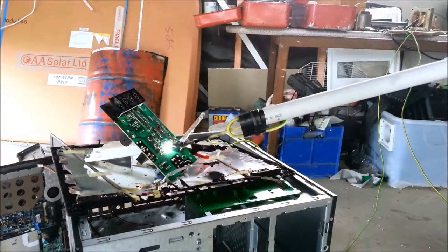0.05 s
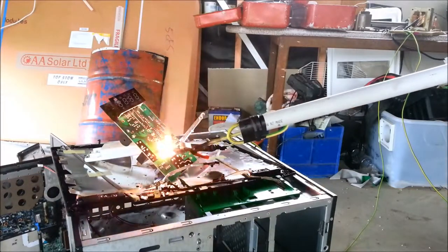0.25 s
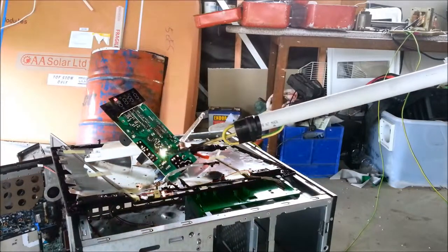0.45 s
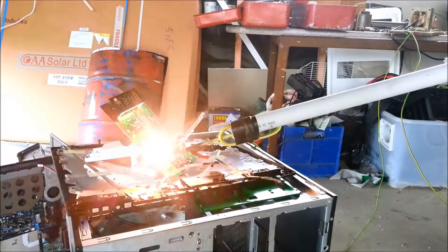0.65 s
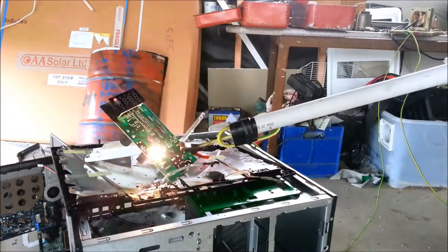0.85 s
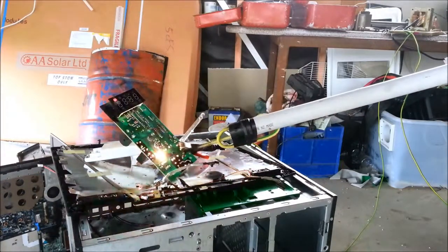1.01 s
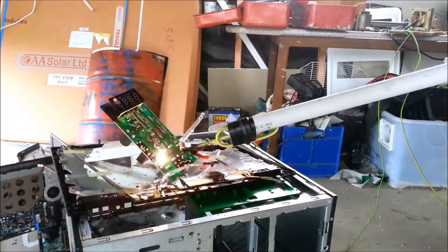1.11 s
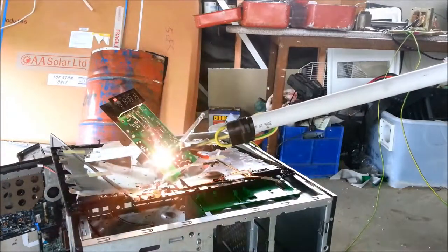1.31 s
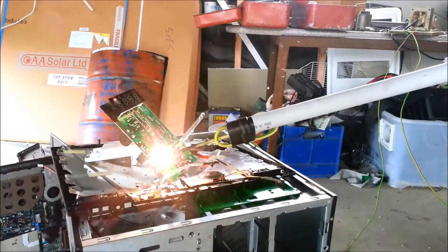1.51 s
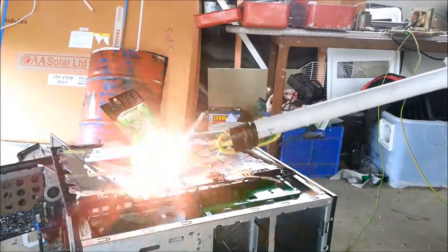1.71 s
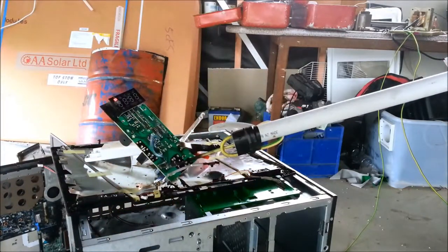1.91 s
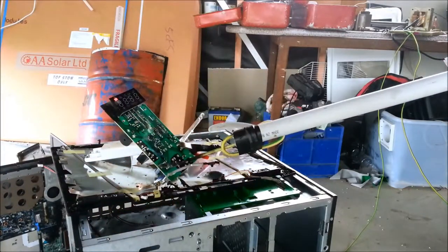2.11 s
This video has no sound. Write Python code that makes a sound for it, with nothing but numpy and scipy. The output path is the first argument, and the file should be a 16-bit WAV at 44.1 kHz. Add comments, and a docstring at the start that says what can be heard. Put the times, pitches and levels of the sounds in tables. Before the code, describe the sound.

Harsh electrical buzzing and sizzling with sharp pops and spark snaps over a low workshop drone.

```python
"""A mains-fed high-voltage arc burns over a circuit board in a small, droning workshop.
From the start it restrikes every half cycle with a push of hot air and a tick: a harsh buzz that hums
in the room and rings the metal case, while the charring board sizzles. Soon the arc flares and pops,
the board cracks and single sparks snap. The arc goes out near the end; a faint squeak follows,
and the room's low drone remains."""
import sys
import numpy as np
from scipy import signal
from scipy.fft import rfft, irfft, next_fast_len
from scipy.io import wavfile
from scipy.ndimage import map_coordinates

SR = 44100
rng = np.random.default_rng(int(sys.argv[2]) if len(sys.argv) > 2 else 0)


def dump(signal):
    """Clip the signal to [-1, 1] and save it as 16-bit WAV at the path in sys.argv[1]."""
    limited = np.clip(np.atleast_2d(signal).T, -1, 1)
    pcm = np.round(limited * 32767).astype(np.int16)
    wavfile.write(sys.argv[1], SR, pcm)


N = 94815


def amp(db):
    """Decibels to amplitude ratio."""
    return 10 ** (np.asarray(db) / 20)


def unit(x):
    """Normalisation to rms 1."""
    return x / np.sqrt(np.mean(x ** 2) + 1e-20)


def along(points, hz):
    """Interpolation of (frequency_hz, value) points on a logarithmic axis."""
    f, v = np.transpose(points)
    return np.interp(np.log(hz + 1), np.log(f + 1), v)


def at(points, s):
    """Linear interpolation of (time_s, value) points."""
    return np.interp(s, *np.transpose(points))


def wobble(rate_hz):
    """Smooth random modulation: a spline through rate_hz random knots a second."""
    knots = rng.standard_normal(int(N * rate_hz / SR) + 4)
    return map_coordinates(knots, [np.arange(N) * rate_hz / SR])


def filtered(x, response):
    """Linear filtering: the spectrum is multiplied by a frequency response."""
    size = 2 * next_fast_len(N)
    return irfft(rfft(x, size) * response(np.fft.rfftfreq(size, 1 / SR)), size)[..., :x.shape[-1]]


def coloured(x, points):
    """Minimum-phase filtering through (frequency_hz, gain_db) points."""
    def response(hz):
        cepstrum = irfft(np.log(amp(along(points, hz))))
        cepstrum[1:len(cepstrum) // 2] *= 2
        cepstrum[len(cepstrum) // 2 + 1:] = 0
        return np.exp(rfft(cepstrum))
    return filtered(x, response)


def add(track, start_s, sound):
    """Superposition of a sound on a track."""
    i = int(np.clip(round(start_s * SR), 0, N))
    track[i:i + len(sound)] += sound[:N - i]


def push(width_ms, rebound=0.17, slower=4):
    """A pressure pulse: brief compression, then a slow, weak rarefaction."""
    u = np.arange(SR // 100) / SR * 1000 / width_ms
    return u * np.exp(1 - u) - rebound * (u / slower) ** 2 * np.exp(1 - u / slower) / 2


def burst(t60_s):
    """A noise transient with exponential decay and a peak near 1."""
    t = np.arange(SR // 40) / SR
    envelope = amp(-60 * t / t60_s) * (1 - np.exp(-20 * t / t60_s)) * 2
    noise = rng.standard_normal(len(t)) * envelope
    return 0.39 * noise * np.linalg.norm(envelope) / np.linalg.norm(noise)


# Strength of the pushes of hot air: time_s, level_db
PUSH_LEVEL = [(0, -36), (.06, -18), (.11, -17), (.2, -39), (.28, -16), (.38, -24.5), (.448, -28),
              (.47, -67), (.502, -21), (.72, -22), (.878, -22), (.892, -54), (1.05, -33.5), (1.25, -25.5),
              (1.6, -19), (1.72, -19), (1.76, -44)]
# Spectral envelope of a push: frequency_hz, gain_db
PUSH_COLOUR = [(100, -3.5), (300, -2.5), (1400, 0), (2500, -3), (4600, 5.5), (6200, -1)]
# Strength of the restrike ticks: time_s, level_db
TICK_LEVEL = [(0, -25.5), (.06, -19.5), (.1, -29.5), (.25, -33.5), (.27, -17.5), (.44, -17), (.465, -34),
              (.52, -23.5), (.69, -21), (.75, -37), (.87, -22.5), (1.55, -37), (1.68, -27), (1.81, -25)]
# Spectral envelope of a tick: frequency_hz, gain_db
TICK_COLOUR = [(300, -30), (1500, 0.5), (4300, -2), (6500, -6), (10000, 3), (14500, 0)]
STRIKES_HZ, FIRST_STRIKE_S, ARC_OUT_S = 100, .0002, 1.825


def arc(jitter_s=.00009, push_scatter_db=2.5, tick_scatter_db=6.5, tick_lag_s=.0002):
    """Thermal expansion: each half cycle the arc restrikes with a push of hot air and a tick."""
    pushes, ticks = np.zeros(N), np.zeros(N)
    for s in np.arange(FIRST_STRIKE_S, ARC_OUT_S, 1 / STRIKES_HZ):
        polarity_db = -1.5 * np.cos(np.pi * STRIKES_HZ * s)  # one direction of current strikes harder
        late, strong, sharp, wide = rng.standard_normal(4)
        start_s = s + jitter_s * late
        push_db = at(PUSH_LEVEL, start_s) + polarity_db + push_scatter_db * strong
        tick_db = at(TICK_LEVEL, start_s) + tick_scatter_db * sharp
        add(pushes, start_s, amp(push_db) * push(width_ms=0.077 * np.exp(0.17 * wide)))
        add(ticks, start_s + tick_lag_s, amp(tick_db) * burst(t60_s=0.0018))
    return coloured(pushes, PUSH_COLOUR) + coloured(ticks, TICK_COLOUR)


# Strength of the board's sizzle: time_s, level_db
SIZZLE_LEVEL = [(0, -39.5), (.12, -51.5), (.25, -45.5), (.29, -46.5), (.47, -43), (.69, -40), (.77, -47),
                (.89, -47), (.92, -41), (1.15, -42), (1.43, -46.5), (1.65, -46), (1.79, -37), (1.82, -46)]
# Spectral envelope of a spit: frequency_hz, gain_db
SIZZLE_COLOUR = [(200, -4.5), (1000, 2), (2500, -3), (3600, -2), (4900, 4), (6200, -5.5), (10000, -6.5),
                 (14500, -6.5)]


def sizzle(spits_per_s=5000, spread_db=5, pulsing_db=5.5, flutter_db=1.0):
    """Shot noise: thousands of tiny spits from the hot board, pulsing with the current."""
    t = np.arange(N) / SR
    spits = (rng.random(N) < spits_per_s / SR) * np.sign(rng.standard_normal(N))
    spits *= amp(spread_db * np.clip(rng.standard_normal(N), -2, 2))
    swing_db = pulsing_db * np.cos(2 * np.pi * STRIKES_HZ * t) + flutter_db * wobble(70)
    return unit(coloured(spits, SIZZLE_COLOUR)) * amp(at(SIZZLE_LEVEL, t) + swing_db) * (t < ARC_OUT_S)


# Multiples of the strike rate that stand in the room: harmonic_number, level_db
HUM_HARMONICS = [(3, 3.5), (4, -6), (6, -3.5), (7, -6.5), (8, -17), (11, -8.5), (12, -12.5), (13, -7.5)]
# Strength of the standing hum: time_s, level_db
HUM_LEVEL = [(0, -56), (.07, -49.5), (.13, -39.5), (.27, -37.5), (.36, -49), (.47, -65), (.55, -53),
             (.85, -48.5), (1.05, -57), (1.27, -47.5), (1.52, -47), (1.68, -38.5), (1.75, -37),
             (1.82, -58.5)]


def hum(waver_db=1.94, rasp_rad=0.16):
    """Standing waves: low harmonics of the buzz waver in the room, roughened by uneven strikes."""
    track, t = np.zeros(N), np.arange(N) / SR
    for harmonic, level_db in HUM_HARMONICS:
        gain = amp(level_db + waver_db * wobble(14.7))
        phase = 2 * np.pi * (harmonic * STRIKES_HZ * t + rng.random())
        track += gain * np.sin(phase + rasp_rad * wobble(STRIKES_HZ))
    return amp(at(HUM_LEVEL, t)) * track


def unsteady(x, top_hz=1350, notch_hz=7):
    """Comb filtering removes the steady low harmonics, whose echo is the standing hum."""
    def response(hz):
        offset_hz = (hz + STRIKES_HZ / 2) % STRIKES_HZ - STRIKES_HZ / 2
        return 1 - (hz < top_hz) * np.exp(-(offset_hz / notch_hz) ** 2)
    return filtered(x, response)


# Modes of the sheet-metal case under the board: pitch_hz, level_db, t60_s
CASE_MODES = [(451, -2.5, 0.38), (572.5, -3, 0.49), (688, -3.5, 0.27), (990, -2.5, 0.52)]


def case(pressure, gain_db=-55):
    """Forced vibration: pressure pulses excite the damped modes of the metal case."""
    t = np.arange(SR // 2) / SR
    ring = sum(amp(level_db - 60 * t / t60_s) * np.sin(2 * np.pi * (pitch_hz * t + rng.random()))
               for pitch_hz, level_db, t60_s in CASE_MODES)
    return amp(gain_db) * signal.fftconvolve(pressure, ring)[:N]


# Left-right likeness of diffuse sound: frequency_hz, coherence
COHERENCE = [(30, 0.01), (120, 0.71), (350, 0.59), (700, 0), (1400, 0), (5000, 0.02)]


def diffuse(size):
    """A diffuse field: stereo noise, partly coherent in the bass and incoherent in the treble."""
    def mid_and_side(hz):
        angle = np.arccos(np.clip(along(COHERENCE, hz), -1, 1)) / 2
        return np.array([np.cos(angle), np.sin(angle)])
    mid, side = filtered(rng.standard_normal((2, size)), mid_and_side)
    return np.array([mid + side, mid - side])


# Spectral envelope of the room's drone: frequency_hz, gain_db
DRONE_COLOUR = [(25, -42), (60, 3.5), (130, 6.5), (250, 5), (700, -1.5), (1200, -12.5), (2600, -15.5),
                (3900, -18), (4500, -21.5), (6000, -24.5), (14500, -24.5)]


def drone(level_db=-43):
    """Ambient noise: a steady, low diffuse field, slightly stronger on the right."""
    balance = amp([[-1], [1]])
    return amp(level_db) * unit(coloured(diffuse(N), DRONE_COLOUR)) * balance


# Reverberation time of the workshop: frequency_hz, t60_s
ROOM_T60 = [(200, 0.52), (1000, 0.3), (4000, 0.34), (14000, 0.4)]
# Spectral envelope of the reverberation: frequency_hz, gain_db
ROOM_COLOUR = [(60, -2), (170, 5.5), (300, -5), (450, -1.5), (680, -5.5), (1100, -2), (1650, 2),
               (2500, -0.5), (3700, -2), (7000, -1), (14000, -3)]


def room(x, gain_db=-3.5, gap_s=0.0012, tails=8):
    """Reverberation: each frequency decays at its own rate; random tails crossfade into one echo."""
    wet = np.zeros((2, N))
    for k in range(tails):
        hz, t, spectra = signal.stft(diffuse(SR // 2), SR, nperseg=256)
        decay = amp(-60 * t / along(ROOM_T60, hz)[:, None])
        tail = signal.istft(spectra * decay, SR, nperseg=256)[1]
        tail *= np.clip(np.arange(tail.shape[1]) / SR / gap_s - 1, 0, 1)  # wait for the first echo
        tail /= np.linalg.norm(tail[0])
        crossfade = np.sqrt(np.clip(1 - abs(np.linspace(0, tails - 1, N) - k), 0, 1))
        wet += signal.fftconvolve((x * crossfade)[None], tail, axes=1)[:, :N]
    return amp(gain_db) * coloured(wet, ROOM_COLOUR)


# Collapses of the flaring arc: start_s, level_db, rebound_hz, rebound_db
POPS = [(0.1223, -14, 3800, -44), (0.1324, -14, 1510, -21.5), (0.1413, -20, 3220, -46),
        (0.1531, -17, 1280, -20), (.1724, -27, 690, -28), (.181, -14.5, 814, -23),
        (.2012, -14.5, 1670, -16.5), (.2098, -28, 590, -23.5), (0.2516, -22, 360, -17),
        (0.2615, -6, 425, -22), (.2809, -21, 790, -30), (0.9109, -16, 1000, -27),
        (1.683, -7.5, 1330, -19.5), (1.6903, -15, 526, -18.5), (1.7017, -17, 670, -17),
        (1.7104, -21, 554, -23.5), (1.7193, -28, 1230, -21.5), (1.7301, -17, 344, -22)]


def pops(rise_cycles=0.52, puff_hz=340, puff_db=-7, puff_t60_s=0.045):
    """Damped oscillation: a flare collapses in a rarefaction; its hot gas rebounds with a rough puff."""
    pulses, puffs, t = np.zeros(N), np.zeros(N), np.arange(SR // 2) / SR
    for start_s, level_db, rebound_hz, rebound_db in POPS:
        u = t * rebound_hz / rise_cycles
        rebound = u * np.exp(1 - u) * np.sin(2 * np.pi * rebound_hz * t)
        add(pulses, start_s, -amp(level_db) * push(width_ms=0.089))
        add(pulses, start_s, -amp(rebound_db) * rebound)
        add(puffs, start_s, amp(rebound_db - 60 * t / puff_t60_s))
    air = unit(filtered(rng.standard_normal(N), lambda hz: 1 / (1 + (2 * hz / puff_hz - 2) ** 2) ** 2))
    return coloured(pulses + amp(puff_db) * puffs * air / 2, PUSH_COLOUR)


# Bits bursting off the board: start_s, level_db, t60_s, pitch_hz
CRACKS = [(0.2819, -8, 0.0065, 5900), (0.5805, -0.5, 0.0062, 13500), (0.5874, -9, .013, 4450),
          (.592, 3.5, 0.0071, 8800), (0.647, -25, 0.003, 7000), (1.767, -23, 0.0059, 9000),
          (1.7802, -15.5, 0.0069, 7440), (1.7887, -16, 0.0048, 4760), (1.868, -25, 0.011, 5500)]
# Spectral envelope of a crack: frequency_hz, gain_db
CRACK_COLOUR = [(150, -4), (1000, -5), (2200, -12), (3300, -5), (4400, 2), (5200, -5.5), (7200, -9),
                (8500, -6.5), (10300, -.5), (11500, -14.5), (13000, -9), (14500, -6)]


def cracks(gain_db=3, ring_width_hz=1800, ring_db=8.5):
    """Fracture and resonance: each bit bursts off in a snap of noise that rings at its own pitch."""
    track = np.zeros(N)
    for start_s, level_db, t60_s, pitch_hz in CRACKS:
        snap = burst(t60_s)
        ring = signal.lfilter(*signal.iirpeak(pitch_hz, pitch_hz / ring_width_hz, SR), snap)
        add(track, start_s, amp(level_db + gain_db) * (snap + (amp(ring_db) - 1) * ring))
    return coloured(track, CRACK_COLOUR)


# Modes of the circuit board: pitch_hz, level_db, t60_s
BOARD_MODES = [(3830, -3, 0.34), (4000, -8, .22)]


def board(gain_db=-51):
    """Free vibration: every crack leaves the board ringing faintly in its damped modes."""
    track, t = np.zeros(N), np.arange(SR // 2) / SR
    ring = sum(amp(level_db - 60 * t / t60_s) * np.sin(2 * np.pi * pitch_hz * t)
               for pitch_hz, level_db, t60_s in BOARD_MODES)
    for start_s, crack_db, _, _ in CRACKS:
        add(track, start_s, amp(crack_db + gain_db) * ring)
    return track


# Single sparks above the buzz: start_s, level_db
SPARKS = [(0.3407, -12), (0.3505, -16), (0.39, -11), (0.4396, -16), (0.4516, -12), (0.5087, -4.5),
          (0.6905, -7), (.7802, -13), (0.84, -12), (0.859, -14), (0.9107, -10), (1.0005, -7), (1.6788, -11),
          (1.7186, -15.5)]


def sparks():
    """Electrical breakdown: single sparks jump with a short, bright snap."""
    track = np.zeros(N)
    for start_s, level_db in SPARKS:
        add(track, start_s, amp(level_db) * burst(t60_s=0.0012))
    return coloured(track, TICK_COLOUR)


def squeak(centre_s=1.995, length_s=0.078, pitch_hz=4620, width_hz=300, level_db=-59, flutter_db=5):
    """Amplitude-modulated narrow-band noise: a faint, high scraping squeak that stutters."""
    t = np.arange(N) / SR
    rasp = unit(filtered(rng.standard_normal(N), lambda hz: np.exp(-((hz - pitch_hz) / width_hz) ** 2)))
    gate = np.clip(10 * (1 - abs(2 * (t - centre_s) / length_s - 1)), 0, 1)
    return amp(level_db + flutter_db * wobble(80)) * rasp * gate


# Response on the left side: frequency_hz, gain_db
LEFT_COLOUR = [(200, 0), (700, 4.5), (1300, -7), (2300, 3.5), (3700, 5.5), (4600, -9), (6200, -9),
               (9000, -5), (14500, -5.5)]


def scene(left_lag_s=0.0002405, left_shade_db=-13):
    """Delay and shadowing: the arc faces the right microphone; the left hears it later and duller."""
    direct = cracks() + arc() + pops() + sizzle() + sparks() + squeak()
    shaded = amp(left_shade_db) * filtered(direct, lambda hz: np.exp(-2j * np.pi * hz * left_lag_s))
    crackle = unsteady(direct)
    left, right = np.array([shaded, direct]) + room(crackle) + hum() + case(crackle) + board()
    return np.array([coloured(left, LEFT_COLOUR), right]) + drone()


def record(dry, ceiling=.68, top_hz=14650):
    """Band limiting and soft saturation: thinner deep bass, rounded peaks and a steep treble cutoff."""
    thinned = coloured(dry, [(20, -7.0), (80, -15.5), (220, -5.5), (1000, 1)])
    rounded = thinned / (1 + (thinned / ceiling) ** 4) ** .25
    return filtered(rounded, lambda hz: 1 / np.sqrt(1 + (hz / top_hz) ** 200))


dry = scene()
out = record(dry)
dump(out)
```